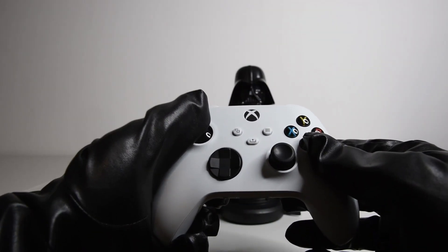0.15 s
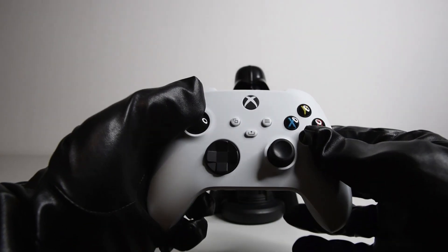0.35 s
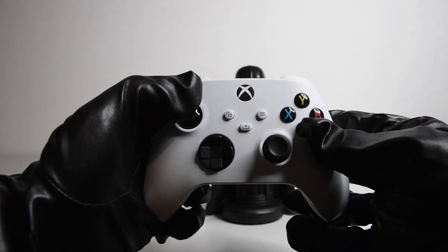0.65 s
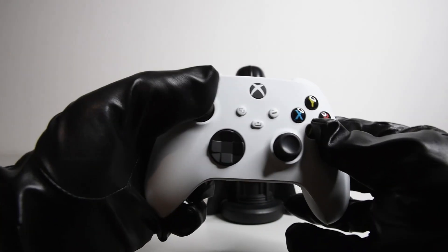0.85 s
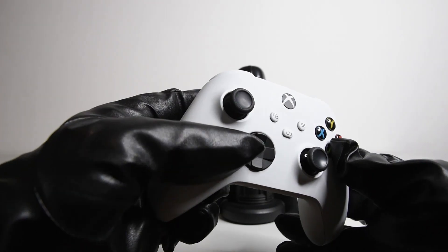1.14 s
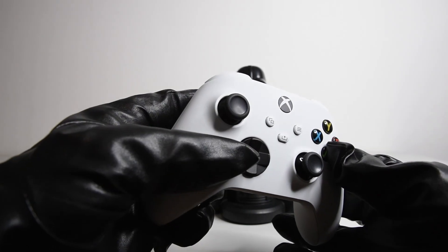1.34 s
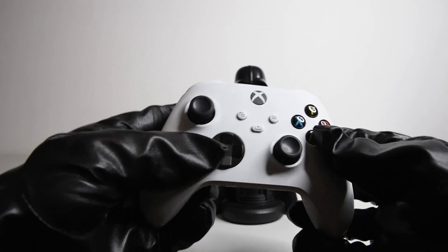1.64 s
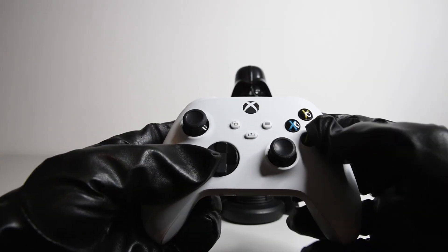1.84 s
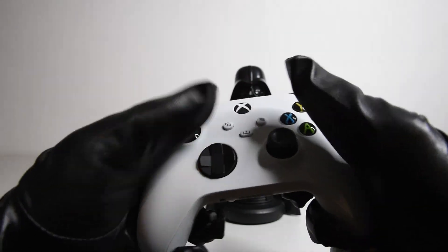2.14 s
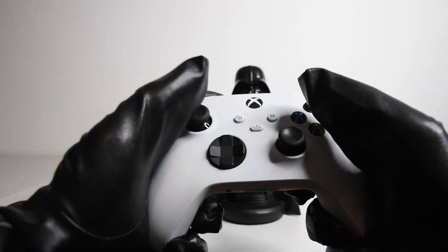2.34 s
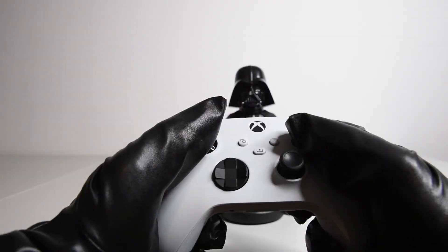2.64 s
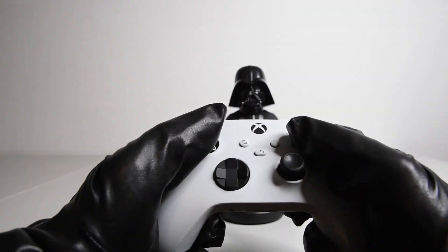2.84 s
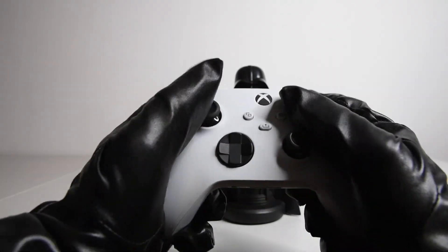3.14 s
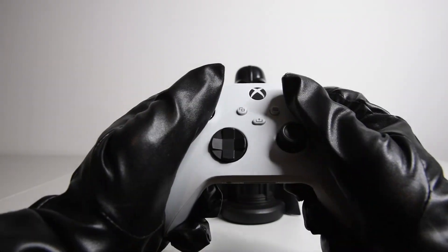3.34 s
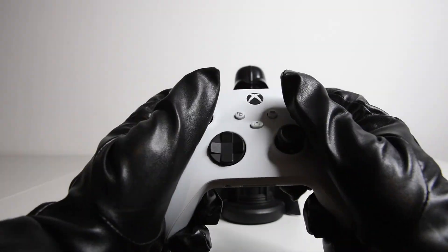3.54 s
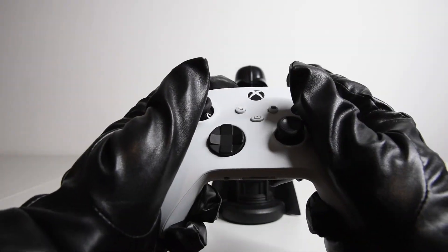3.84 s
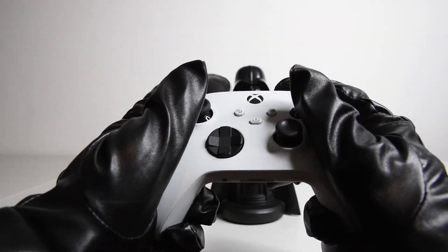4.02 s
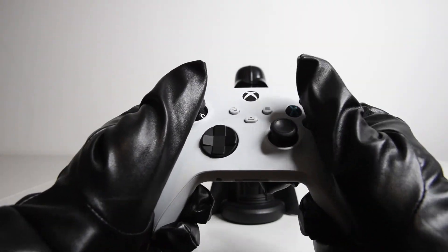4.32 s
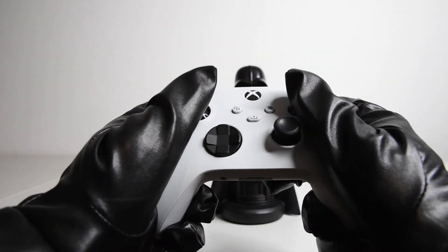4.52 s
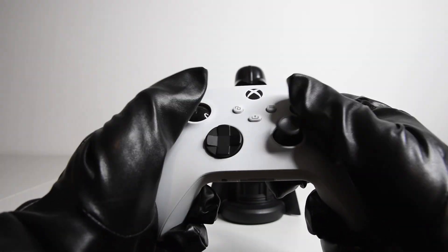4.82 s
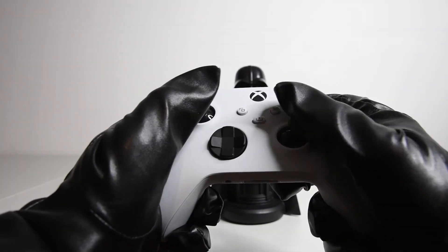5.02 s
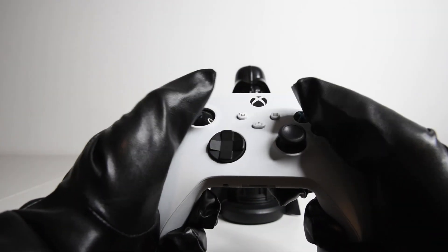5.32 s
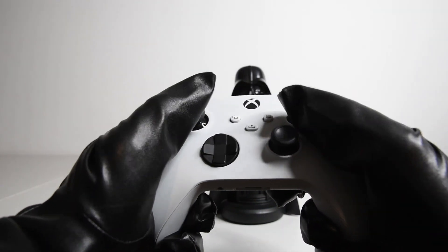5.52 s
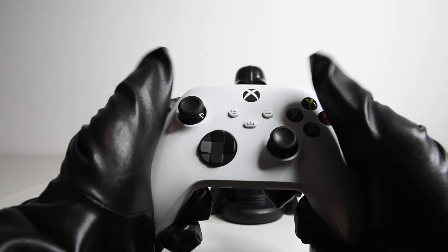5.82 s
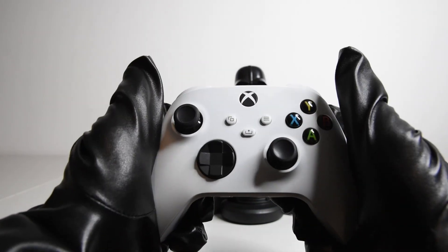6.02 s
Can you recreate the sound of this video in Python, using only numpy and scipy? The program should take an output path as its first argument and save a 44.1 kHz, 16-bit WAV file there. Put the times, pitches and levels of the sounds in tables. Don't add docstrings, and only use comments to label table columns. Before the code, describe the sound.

Very close, in a quiet small room, leather gloves handle a hollow plastic game controller. One distinct click comes early, then faint ticks and rubbing for nearly two seconds. Clicks grow more frequent, then an even run of trigger clacks around four seconds leads to dense, loud button mashing near five. It ends in small rattles as the hands go still. Faint steady hiss underneath.

```python
import sys
import numpy as np
from scipy import signal
from scipy.fft import rfft, irfft, next_fast_len
from scipy.io import wavfile

SR = 44100
rng = np.random.default_rng(int(sys.argv[2]) if len(sys.argv) > 2 else 0)


def dump_mix(stems):
    frames = np.atleast_2d(stems).T
    limited = np.clip(frames, -1, 1)
    pcm = np.round(limited * 32767).astype(np.int16)
    wavfile.write(sys.argv[1], SR, pcm)


def volts_from_decibels(level):
    exponent = np.asarray(level, float) / 20
    return 10 ** exponent


N = 272097


def rms_one(x):
    return x / np.sqrt(np.mean(x ** 2) + 1e-20)


def at_hz(points, hz):
    point_hz, value = np.array(points).T
    return np.interp(np.log(hz + 1), np.log(point_hz), value)


def bandpass(x, order, low_hz, high_hz):
    return signal.sosfilt(signal.butter(order, [low_hz, high_hz], "band", fs=SR, output="sos"), x)


def highpass(x, order, low_hz):
    return signal.sosfilt(signal.butter(order, low_hz, "high", fs=SR, output="sos"), x)


def colour(x, spectrum):
    size = next_fast_len(N)
    hz = np.fft.rfftfreq(size, 1 / SR)
    gain = volts_from_decibels(at_hz(spectrum, hz)) * (hz < 15780)
    return rms_one(irfft(rfft(x, size) * gain, size)[..., :N])


def drift(rate_hz):
    slow = signal.butter(2, rate_hz, fs=SR, output="sos")
    return rms_one(signal.sosfilt(slow, rng.standard_normal(N + SR))[SR:])


def strikes(start_s, peak_db):
    out = np.zeros(N)
    out[np.round(start_s * SR).astype(int)] += volts_from_decibels(peak_db)
    return out


def hands():
    # time_s, rub_db
    grip = [
        (0, -72),
        (.8, -73),
        (1.4, -71),
        (2.45, -68.5),
        (3.0, -63.5),
        (4.6, -67.5),
        (5.6, -62.5),
        (6.05, -67),
        (6.17, -89.5),
    ]
    # peak_s, peak_db, fade_s (time to fall 10 dB; anything under
    # 0.02, even a negative value, counts as 0.02), bright_db
    strokes = [(.3, -64, -0.25, -3), (.41, -61, 0.12, 2), (.55, -70, 0.1, -3), (.86, -68.5, .08, -2),
               (.96, -60, 0.07, 5), (1.14, -58, 0.14, -7), (1.26, -73, -0.3, 0), (1.7, -58, 0.09, 7),
               (1.93, -58, 0.1, 4.5), (2.04, -55.5, 0.07, 0), (2.165, -52.5, 0.17, 9.5),
               (2.27, -60, -0.16, -16), (2.56, -58.5, -0.2, -7), (2.72, -51, -0.17, -7),
               (3.05, -59, 0.13, 10), (3.37, -73, -0.9, -7), (3.73, -58, 0.2, 7), (3.97, -69, -1.2, 3),
               (4.2, -63, 0.8, 12), (4.371, -56, 0.04, -3), (4.72, -57.5, 0.17, 8), (4.92, -55, 0.13, -6),
               (5.16, -52.5, 0.05, 3), (5.52, -74, -0.75, -6), (5.77, -59, -0.26, -5),
               (5.919, -53.5, 0.11, -11), (6.0, -60.5, 0.07, -4)]
    t = np.arange(0, N, 64) / SR
    peak_s, peak_db, fade_s, bright_db = np.transpose(strokes)[..., None]
    power = volts_from_decibels(2 * (peak_db - 10 * np.abs(t - peak_s) / np.maximum(fade_s, 0.02)))
    total = power.sum(axis=0) + volts_from_decibels(2 * np.interp(t, *np.transpose(grip)))
    rub_db = 10 * np.log10(total)
    brightness_db = (power * bright_db).sum(axis=0) / total
    every_sample = np.arange(N) / SR
    return np.interp(every_sample, t, rub_db), np.interp(every_sample, t, brightness_db)


def gloves():
    # pitch_hz, level_db (per Hz)
    rub_spectrum = [(250, -6.5), (500, -3.5), (860, 0.5), (1200, -0.5), (2000, 2.5), (3000, -2.5),
                    (5000, -4.5), (6800, -10.5), (8500, -7.5), (9500, -13.5), (10500, -28), (13000, -30),
                    (15700, -37)]
    # pitch_hz, level_db (per Hz)
    rumble_spectrum = [(20, 11.5), (60, 4), (130, -3.5), (300, -33), (600, -12.5)]
    grains_per_s, rumble_db = 1500, -60
    rub_db, bright_db = hands()

    sizes = volts_from_decibels(5.5 * np.minimum(rng.exponential(1, N), 5)) * rng.choice([-1, 1], N)
    slips = rng.random(N) < grains_per_s * volts_from_decibels(3.0 * drift(40)) / SR
    grains = rms_one(sizes * slips)
    friction = rng.standard_normal(N) * volts_from_decibels(1.5 * drift(40))
    rub = colour(0.45 * grains + friction, rub_spectrum)

    rub = rub + (volts_from_decibels(bright_db) - 1) * highpass(rub, 2, 6500)
    rub = rub + (volts_from_decibels(1.38 * bright_db) - 1) * highpass(rub, 4, 9800)

    rumble = colour(rng.standard_normal(N), rumble_spectrum) * volts_from_decibels(2.2 * drift(8.1))
    shake_db = rumble_db + 0.5 * (rub_db + 55.5)
    return volts_from_decibels(rub_db + 3.0) * rub + volts_from_decibels(shake_db) * rumble


def quiet_air():
    # pitch_hz, level_db (per Hz)
    air_spectrum = [(20, -9), (100, -7.5), (300, -9.5), (1000, -17.5), (2000, -21.5), (4000, -23.5),
                    (6500, -26.5), (8600, -21.5), (10300, -29), (15700, -28)]
    return volts_from_decibels(-66.5) * colour(rng.standard_normal(N), air_spectrum)


def preamplifier_hiss():
    # pitch_hz, level_db (per Hz)
    hiss_spectrum = [(20, 7.5), (150, 4), (700, -3), (4000, -3.5), (15700, -2.5)]
    return volts_from_decibels(-65) * colour(rng.standard_normal((2, N)), hiss_spectrum)


def contacts():
    buttons = [(0.232, -26.5, -12, 3100), (0.405, -45, 1.5, 3170), (1.19, -47, 5, 5700),
               (1.248, -52, 9, 2210.0), (2.002, -30, -10.5, 1650), (2.196, -33.5, -6, 2930),
               (2.694, -35, -2, 3300), (2.796, -19, 5, 3940), (2.95, -59, -28, 1470),
               (3.008, -21, 3.5, 2990), (3.572, -17.5, 3.5, 3530.0), (4.66, -35, -2, 2224),
               (4.676, -29, -0.5, 3500), (4.838, -8.5, -5.5, 3300), (5.3575, -22, 2, 3560.0),
               (5.841, -13.5, 4.5, 3520), (5.846, -20.5, 3, 3050)]
    pad = [(0.393, -43, 2.0, 2250.0), (0.918, -47, 0, 930.0), (2.239, -41.5, -3.5, 680),
           (2.472, -27, -3, 830), (2.603, -24.5, 15.5, 5850), (2.87, -27.0, 0, 1640),
           (3.315, -35, -2.5, 910), (3.849, -39, -2.5, 970.0), (4.365, -43, -3, 1070.0),
           (4.391, -37, -6.5, 600.0), (4.6083, -32.0, 0.5, 1700), (5.209, -39.5, -1.5, 1520),
           (5.623, -25.5, 3, 1650), (5.745, -35, -2, 1500), (5.784, -34.5, -7.5, 810.0),
           (5.816, -45, 7, 2100), (6.063, -41.5, 4, 1880.0), (6.099, -44.0, 0.5, 1200.0)]
    triggers = [(0.495, -47.5, -1, 1970), (0.807, -42, -4, 2700), (0.874, -50.0, -4, 2430),
                (0.931, -38.5, 4, 2030), (2.843, -40, -13.5, 3100), (2.962, -47.5, -7, 2290.0),
                (3.531, -52, -19, 3040), (3.743, -24.5, 4, 1810), (3.9104, -20, 3, 1060),
                (4.021, -23, 5.5, 1090), (4.1297, -19, 4.5, 1060), (4.214, -24, 7.5, 1040),
                (4.337, -40, 5, 2240), (4.515, -39.5, -5, 2127), (4.7, -30, 3, 2040),
                (4.783, -59, -2, 1940.0), (4.793, -46, 1, 2190), (4.8493, -12.5, -6, 3220),
                (4.986, -37, 3, 1980), (5.094, -14.5, -5.5, 3420), (5.335, -38.5, -0.5, 1610),
                (5.4168, -18, -8.5, 3220.0), (5.835, -35.5, -5, 3500), (5.896, -35.5, 4, 1820.0),
                (6.009, -40.5, 9, 1500)]
    sticks = [(0.599, -51.5, 2, 2830), (2.006, -32.5, 5, 1635), (2.067, -57, -8.0, 900),
              (2.254, -45, -7, 820.0), (2.715, -34.5, -3, 3120), (3.335, -40.5, 6, 2680),
              (3.406, -43.5, -9, 652), (3.438, -37.5, -12, 797), (3.61, -22, 1, 3160),
              (3.732, -47, -21, 700), (3.864, -44.5, -15, 990), (4.309, -43.5, -13.5, 1050),
              (4.898, -28.5, 16, 2690.0), (5.143, -24.5, 5, 2760), (5.153, -34, 1, 850.0)]
    returns = [(0.905, -51.0, 2, 4070.0), (2.462, -36.5, -3, 2010.0), (2.5956, -24, 8.5, 3120),
               (2.701, -28, -5, 1630.0), (3.127, -27.5, -8, 800.0), (3.398, -52.5, 5.5, 4200),
               (3.534, -54, 14.5, 3200), (3.576, -48, 13, 3400), (3.717, -37, -22.5, 680),
               (3.805, -42.5, 2, 3130), (4.011, -30.5, -13.5, 1030), (4.24, -35.5, -14.5, 1030),
               (4.444, -38.5, -1.5, 5200), (4.648, -57, 0, 3030.0), (4.747, -46, 0, 870.0),
               (4.9575, -33.5, 11.5, 3580), (5.454, -24, 4.5, 3440), (5.861, -41, 8.5, 3700)]
    bumpers = [(1.959, -43.5, 3, 2250), (3.025, -22.5, -0.5, 3150), (3.2428, -13.5, 9.5, 4270),
               (3.266, -25.5, 5, 5040), (3.427, -43, 3, 2830), (3.488, -34, -11.5, 3040.0),
               (4.531, -43.5, -17, 866), (4.909, -32, -11.5, 790), (4.943, -41.5, -9.5, 3160),
               (5.267, -26.5, -10, 3370.0), (5.37, -17.5, 10, 5995), (5.544, -19, 3.5, 3420),
               (5.707, -37, -4, 1730), (5.7154, -19, 4, 3550)]
    # start_s, peak_db, ring_hz
    bounces = [(0.225, -48, 2100), (.385, -51, 2900), (.85, -48, 2000), (1.04, -52, 2000),
               (1.144, -44, 2130), (1.213, -44.5, 2010), (1.295, -48, 1720), (1.35, -53, 1560),
               (1.4, -54, 1370), (1.487, -54, 900), (1.532, -49.5, 1410), (1.588, -45.5, 2000),
               (1.971, -41.5, 1910), (1.982, -41, 2020), (2.361, -47.5, 1520), (2.561, -43, 2000),
               (2.577, -40, 2000), (2.586, -39, 2230), (2.599, -28.5, 3260), (2.98, -49.5, 2000),
               (2.997, -53, 2000), (4.05, -47, 1800), (4.116, -48, 1800), (4.322, -46, 1800),
               (4.356, -37.5, 1590), (4.498, -48, 1800), (4.667, -41, 2500), (4.685, -35, 2500),
               (4.705, -28.5, 1980), (4.878, -33, 2940), (4.961, -29.5, 3570), (5.096, -31, 1720),
               (5.362, -27.5, 3220), (5.419, -26, 1940), (5.459, -29, 1000), (5.469, -47, 3000),
               (5.533, -42, 1500), (5.555, -31, 1610), (5.629, -32.5, 2900), (5.737, -34, 1480),
               (5.851, -26, 3750), (5.98, -47, 2000), (6.019, -40.5, 1980), (6.05, -50, 2000),
               (2.593, -38, 2500), (2.802, -31, 3130), (2.814, -37, 1400), (4.126, -32, 1016),
               (3.913, -29, 1720)]

    # cavity_db, walls_db, caps_db, snap_db, tick_db;
    # row one for a square hit, row two the change for each dB of crispness
    button_colour = [(-40.5, -17.5, -10, -11, -20), (1.4, -0.8, -0.2, 0.52, 0.5)]
    pad_colour = [(-11.5, -11.5, -14.5, -14.5, -20), (-1.03, -0.15, -0.16, 1.135, 0.88)]
    trigger_colour = [(-20.5, -10.5, -14, -14.5, -14), (0.6, 0.15, -0.98, 0.48, 1.07)]
    stick_colour = [(-15, -13, -7.5, -15, -11.5), (-1.23, -0.03, 0.47, 0.32, 0.5)]
    return_colour = [(-14, -14.5, -9.5, -10, -19), (-0.6, 0, 1.24, 0.5, -0.5)]
    bumper_colour = [(-21.5, -17, -10, -9.5, -22), (-1.32, -0.37, -0.35, 0.54, 1)]
    bounce_colour = [(-20.5, -13, -14, -22, -26), (0, 0, 0, 0, 0)]

    # start_s, walls_hz, caps_hz, snap_hz
    strong_rings = [(0.232, 1580, 3080, 3220), (2.002, 1720, 3030, 4700), (2.196, 1810, 2900, 4650),
                    (2.472, 1610, 2700, 5360), (2.595, 2020, 3110, 5230), (2.603, 1710, 3070, 7650),
                    (2.701, 1640, 3470, 8460), (2.796, 1980, 4030, 7500), (2.87, 1640, 1650, 5800),
                    (3.008, 2920, 3020, 5250), (3.025, 2060, 3160, 8050), (3.127, 1674, 3030, 8090),
                    (3.242, 2240, 2630, 6950), (3.266, 4200, 4200, 4200), (3.488, 3040, 3040, 4370),
                    (3.572, 3630, 3630, 4340), (3.61, 1780, 3100, 3030), (3.743, 1840, 2930, 8720),
                    (3.911, 1660, 3060, 4800), (4.021, 1920, 3030, 8660), (4.129, 1660, 3280, 8200),
                    (4.214, 1790, 3050, 4470), (4.609, 1730, 1720, 6860), (4.676, 2020, 3500, 7650),
                    (4.699, 2000, 2030, 4360), (4.838, 1810, 3340, 7050), (4.85, 1550, 3250, 3130),
                    (4.899, 1630, 2800, 2680), (4.958, 3540, 3560, 4280), (5.094, 1710, 3305, 7000),
                    (5.143, 2050, 2750, 2670), (5.267, 1590, 3370, 5300), (5.357, 3570, 3570, 5530),
                    (5.37, 1640, 3390, 7860), (5.416, 1637, 3260, 3230), (5.454, 1730, 3370, 5600),
                    (5.544, 1690, 3400, 5760), (5.623, 1750, 3000, 5400), (5.716, 1700, 3550, 4700),
                    (5.841, 2830, 3970, 6130)]
    # start_s, cavity_db, walls_db,
    # caps_db, snap_db
    family_accents = [(0.232, -1.0, 2.5, 0.5, -6), (2.002, -13.0, -1.5, -1.5, 2), (2.196, -4.0, -0.5, 2.5, -4),
                      (2.472, 0.5, -3, 2.5, 2.5), (2.595, 1, 3.5, -1.5, -2.5), (2.603, -2.5, -2.5, 7, 0.5),
                      (2.701, 2, 4.5, 1.0, -2.5), (2.796, 6.5, 3.5, 1.0, -0.9), (2.87, 3, 1.0, 0.5, -0.5),
                      (3.008, -8, 1.5, 2, -1.0), (3.025, -1, 4, 0.3, -1), (3.127, -0.5, 0.3, 2, 0),
                      (3.242, -2, 2.5, 1.5, -1.1), (3.266, 7, -5, -4, 0.5), (3.488, -4.5, -3, 0, 0.5),
                      (3.572, -2.5, -2.5, -1.5, -0.5), (3.61, 1, 2, -1, 1.5), (3.743, -1, 0, 0, 2.5),
                      (3.911, 0.5, 1.5, -2.2, 0), (4.021, 1.0, -1.0, 0, 2.5), (4.129, 1.5, 1.2, 0, -1),
                      (4.214, 1, 0.3, 4, 0.1), (4.609, 4, 0, 0, 1), (4.676, -3, 3, 1, 1.5),
                      (4.699, 4, 1.5, -5, -0.5), (4.838, 10, 2, 0, 0), (4.85, -15, -0.3, -0.5, -2.5),
                      (4.899, -1.5, 1, -4.5, 2), (4.958, 3.5, -3, -0.5, -3), (5.094, 1.5, 0.2, -0.2, 2.5),
                      (5.143, -3, -2, -4, 0), (5.267, -1.5, -0.5, -1, 1), (5.357, 6, -3, 2, 0),
                      (5.37, 4.5, -1.5, -1, 1.0), (5.416, 4, 0, -1.0, 0), (5.454, 2, -10, 1, -1),
                      (5.544, -1, 1.5, 1, -1.5), (5.623, 5, -1, 1, -3), (5.716, 3.5, -1.0, 2.5, 1),
                      (5.841, 7, -0.5, 1.5, -2.5)]

    plain_bounces = [(start_s, peak_db, 0, ring_hz) for start_s, peak_db, ring_hz in bounces]
    parts = [(sticks, stick_colour), (pad, pad_colour), (bumpers, bumper_colour),
             (triggers, trigger_colour), (returns, return_colour), (buttons, button_colour),
             (plain_bounces, bounce_colour)]
    hits = []
    for events, (square_db, change) in parts:
        for start_s, peak_db, crisp_db, ring_hz in events:
            levels_db = peak_db + np.add(square_db, np.multiply(crisp_db, change))
            hits.append((start_s, *[ring_hz] * 4, *levels_db))
    hits = np.array(hits)

    parts_s = hits[:-len(bounces), 0]
    for (start_s, *rings_hz), (_, *accent_db) in zip(strong_rings, family_accents):
        strong = np.argmin(np.abs(parts_s - start_s))
        hits[strong, 1:4] = rings_hz
        hits[strong, 5:9] += accent_db
    return hits


def clicks():
    # pitch_hz, level_db, t60_s (time to die by 60 dB)
    cavity = [(510, -4, 0.0063), (620, -7, 0.012), (776, -7, 0.019), (1052, -2.5, 0.0092)]
    walls = [(1303, -3.5, 0.0064), (1469, -12, 0.02), (1675, -2.5, 0.011), (2015, -0.5, 0.0048),
             (2082, -6.5, 0.012)]
    caps = [(2334, 3.5, 0.0044), (2866, -2, 0.017), (2978, -4.5, 0.023), (3370, 2.5, 0.01),
            (3954, -12, 0.026), (4020, -6, 0.0087)]
    snap = [(4432, 3, 0.0037), (5174, -10, 0.016), (5550, -1.5, 0.0045), (6074, -5, 0.01),
            (6860, -3.5, 0.0054), (6630, -15, 0.013), (7610, -1, 0.0073), (8640, -2.5, 0.0081),
            (9210, -0.5, 0.0021)]
    # level_db for cavity, walls, caps, snap
    family_level_db = [2.2, 3.76, 3.6, 1.96]
    # fade_s for cavity, walls, caps, snap
    blur_s = [.008, .003, .001, .0005]
    spread_db, detune, rise_s = 2.5, 0.026, 0.00022
    favour_db, favour_octaves, snap_share = 11, 0.12, 0.52

    out = np.zeros((2, N + SR))
    t = np.arange(round(0.035 * SR)) / SR
    modes = np.array(cavity + walls + caps + snap)
    mode_hz, mode_db = modes[:, 0], modes[:, 1]
    family = np.repeat(np.arange(4), [len(cavity), len(walls), len(caps), len(snap)])
    in_family = family == np.arange(4)[:, None]
    favour = favour_db * np.where(family == 3, snap_share, 1)
    alternate = (-1) ** np.arange(len(modes))
    decay = volts_from_decibels(-60 * t / modes[:, 2:]) * (1 - np.exp(-t / rise_s))
    blur = np.exp(-t / np.array(blur_s)[:, None])

    hits = contacts()
    luck = rng.standard_normal((len(hits), 2, len(modes)))
    rattle = rng.standard_normal((len(hits), 4, 600)) * 0.037 * np.exp(-t[:600] / 0.0047)
    rattle[..., 0] += 1

    for hit, (tune, strength), contact in zip(hits, luck, rattle):
        start_s, rings_hz, family_db = hit[0], hit[1:5], hit[5:9]
        hz = mode_hz * (1 + detune * tune)
        nearest = np.argmin(np.abs(np.log(hz[:, None] / rings_hz)), axis=1)
        ring_hz = rings_hz[nearest]
        near = np.exp(-(np.log2(hz / ring_hz) / favour_octaves) ** 2)
        pulled_hz = hz + near * (ring_hz - hz)
        rings = np.sin(2 * np.pi * pulled_hz[:, None] * t) * decay
        level = volts_from_decibels(mode_db + spread_db * strength + favour * near)
        level *= np.where(near > 0.5, 1, alternate)
        blow = (level * in_family) @ rings

        at = round((start_s + 0.0004) * SR)
        direct = signal.fftconvolve(blow, contact, axes=1)
        for k, by_family in enumerate([direct, blow * blur]):
            even = by_family / np.sqrt(np.sum(by_family ** 2, axis=1, keepdims=True) / 100)
            out[k, at:at + even.shape[1]] += volts_from_decibels(np.add(family_db, family_level_db)) @ even
    return bandpass(out[:, :N], 4, 430, 10000)


def ticks():
    t = np.arange(SR // 50) / SR
    hits = contacts()
    impulses = strikes(hits[:, 0] + 0.00092, hits[:, -1] + 7.5)
    shape = t / 0.00074 * np.exp(-t / 0.00069)
    burst = signal.fftconvolve(impulses, shape)[:N]
    return bandpass(burst * rng.standard_normal(N), 4, 9500, 15500)


def spring():
    # start_s, peak_db
    hums = [(0.231, -43.5), (0.942, -49), (2.472, -55), (2.602, -47), (2.701, -48), (3.127, -45),
            (3.314, -47), (3.439, -44), (3.609, -49), (3.716, -62), (3.733, -39.5), (3.742, -43),
            (3.863, -48), (4.241, -47.5), (4.309, -47), (4.391, -44), (4.531, -45), (4.608, -42.5),
            (4.71, -33.5), (4.838, -31.5), (4.899, -40), (5.093, -42), (5.144, -35.5), (5.154, -37),
            (5.208, -43.5), (5.334, -50), (5.418, -38.5), (5.453, -49), (5.622, -37), (5.756, -43)]
    coil_hz, partner_hz, partner_db, t60_s = 857.4, 800, -9.5, 0.085
    out = np.zeros(N + SR)
    t = np.arange(SR // 5) / SR
    swell = 1 - np.exp(-t / 0.001)
    for (start_s, peak_db), (tune, beat, damp) in zip(hums, rng.standard_normal((len(hums), 3))):
        coil = np.sin(2 * np.pi * coil_hz * (1 + 0.015 * tune) * t)
        partner = volts_from_decibels(partner_db) * np.sin(2 * np.pi * partner_hz * (1 + 0.06 * beat) * t)
        fade_db = 60 * t / t60_s * volts_from_decibels(2 * damp)
        at = round(start_s * SR)
        out[at:at + len(t)] += volts_from_decibels(peak_db + 2.5 - fade_db) * swell * (coil + partner)
    return out[:N]


def thumps():
    # start_s, peak_db
    landings = [(1.99, -52), (2.159, -73), (2.462, -55), (2.691, -49), (2.859, -51), (3.117, -50),
                (3.23, -50), (3.397, -51.5), (3.56, -57.5), (4.116, -52), (4.204, -52), (4.349, -53),
                (4.698, -48.5), (4.826, -49), (5.255, -51), (5.365, -57), (5.408, -68), (5.448, -49),
                (5.536, -49), (5.615, -51), (5.736, -51), (5.888, -46)]
    start_s, peak_db = np.transpose(landings)
    t = np.arange(SR // 8) / SR
    shape = t / 0.0098 * np.exp(-t / 0.0099)
    lump = signal.fftconvolve(strikes(start_s, peak_db + 2.5), shape)[:N]
    low_noise = [(30, -4.5), (110, 0.0), (300, -6.5), (600, -12.5), (2000, -65)]  # Hz, dB
    return lump * colour(rng.standard_normal(N), low_noise)


def room(x):
    # pitch_hz, t60_s (time to die by 60 dB)
    dying_time = [(300, 0.55), (1000, 0.29), (3000, 0.27), (8000, 0.31), (16000, 0.26)]
    tail_db, echo_s, echo_db, smear_s = -14.5, 0.0207, -20.5, 0.0023
    t = np.arange(SR // 2) / SR
    tail = 0
    edges_hz = 200 * 2 ** np.arange(0, 6.6, 0.5)
    for low_hz, high_hz in zip(edges_hz, edges_hz[1:]):
        band = bandpass(rng.standard_normal(len(t)), 2, low_hz, high_hz)
        tail = tail + band * volts_from_decibels(-60 * t / at_hz(dying_time, np.sqrt(low_hz * high_hz)))
    tail = tail * (1 - np.exp(-t / 0.00087))
    tail = volts_from_decibels(tail_db) * tail / np.sqrt(np.sum(tail ** 2))

    late = np.maximum(t - echo_s, 0) / smear_s
    echo = late * np.exp(-late) * rng.standard_normal(len(t))
    echo = volts_from_decibels(echo_db) * echo / np.sqrt(np.sum(echo ** 2))
    return signal.fftconvolve(x, tail + echo)[:N]


def scene():
    rubbing = gloves()
    heard, all_round = clicks()
    small_sounds = spring() + ticks()
    answer = room(all_round + small_sounds)
    mix = heard + small_sounds + answer + rubbing + thumps() + quiet_air()
    return np.tile(mix, (2, 1))


def band_limit(x):
    return signal.sosfilt(signal.butter(12, 16800, fs=SR, output="sos"), x)


def record(dry):
    top_cut = signal.cheby2(10, 60, 16900, fs=SR, output="sos")
    return band_limit(signal.sosfilt(top_cut, dry + preamplifier_hiss()))


dry = scene()
out = record(dry)
dump_mix(out)
```